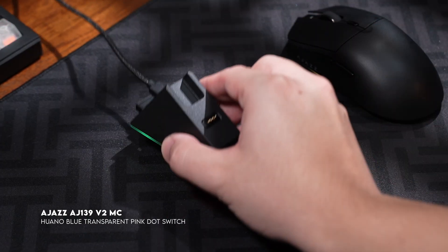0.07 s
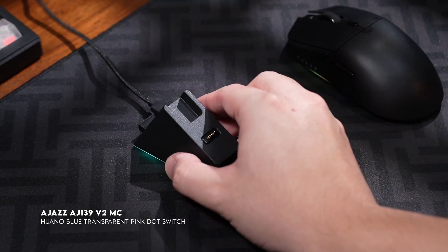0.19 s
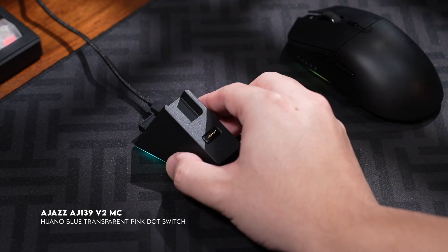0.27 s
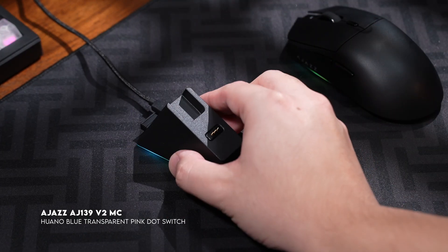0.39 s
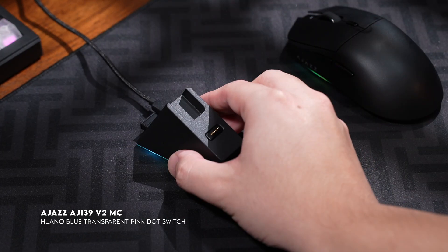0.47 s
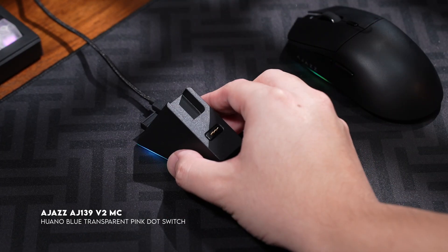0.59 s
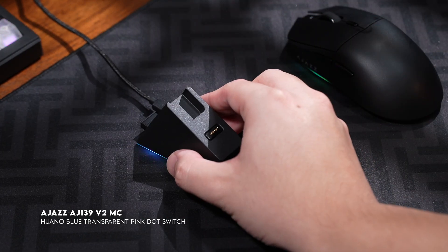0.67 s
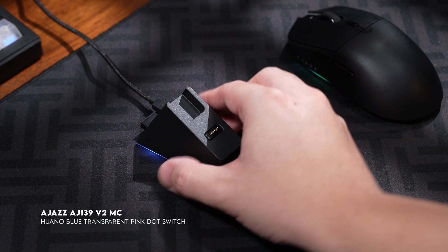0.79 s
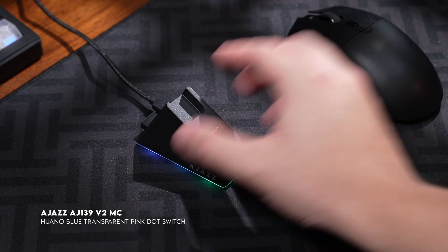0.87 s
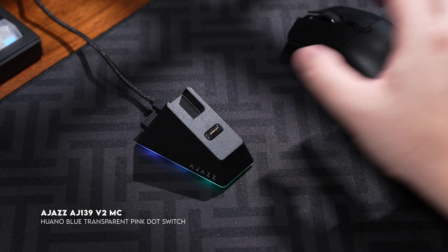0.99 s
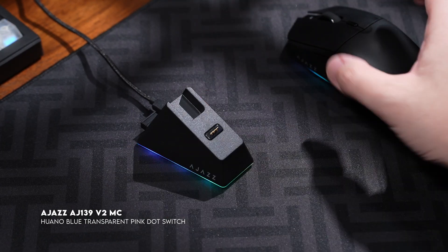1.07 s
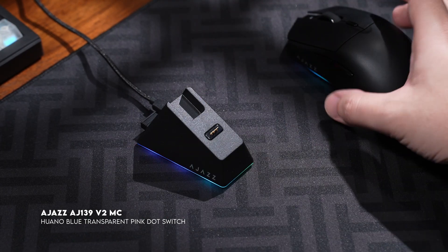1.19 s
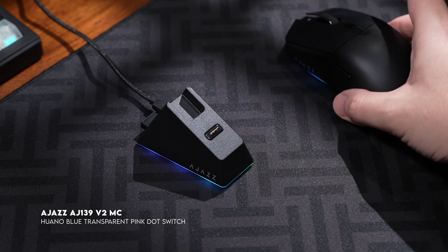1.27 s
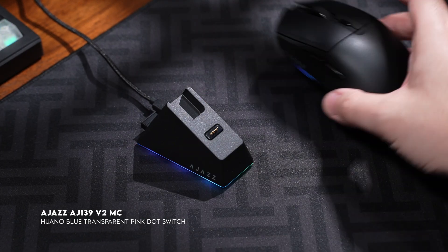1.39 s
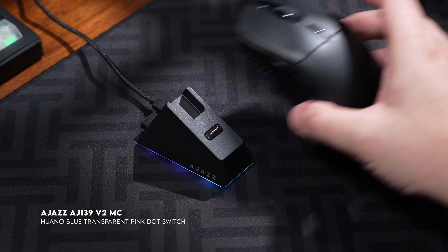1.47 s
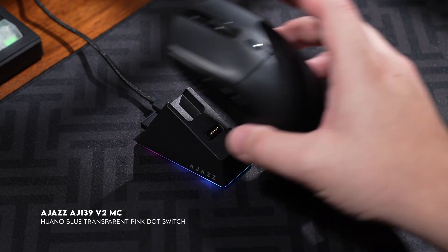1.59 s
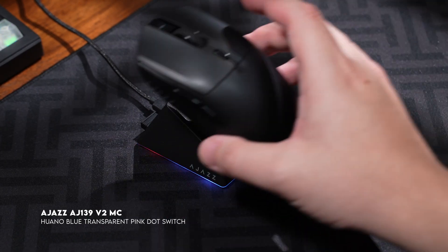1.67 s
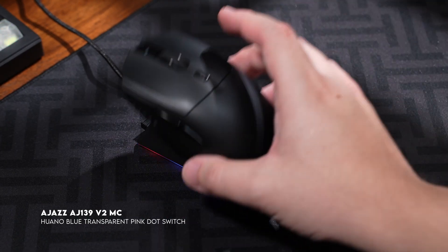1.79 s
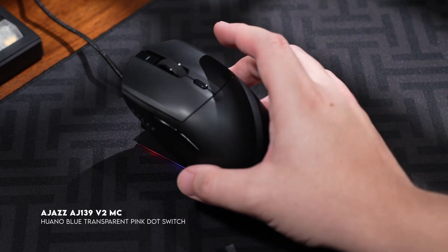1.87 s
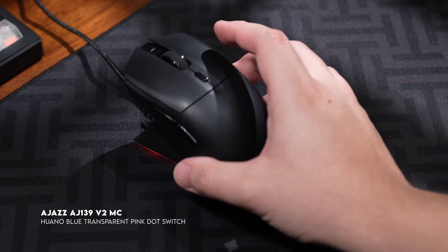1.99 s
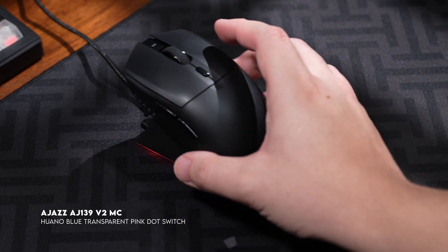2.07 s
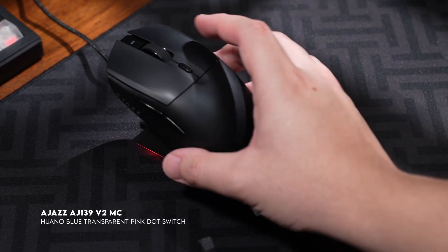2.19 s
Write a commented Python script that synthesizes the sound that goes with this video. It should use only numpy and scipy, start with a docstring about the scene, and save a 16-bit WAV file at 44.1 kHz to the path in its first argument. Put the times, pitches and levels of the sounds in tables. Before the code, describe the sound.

Two plastic knocks in a small, quietly humming room, close microphone. At 0.23 s a charging dock lands on a padded desk with a quick clattering thud and short boom. Faint finger brushes follow, clearest near 0.85 and 1.3 s. At 1.89 s a mouse clacks louder and brighter onto the dock, then scrapes and squeaks briefly at 2.0-2.2 s. A very faint high whine appears from about 1.5 s.

```python
"""Small room, low hum, one close microphone over a padded desk: hum bands and room tone run throughout.
First a plastic charging dock is set down: noise cracks, ringing housing modes, desk boom, room echo.
Then fingers brush it, swells of soft noise, and take hold of a computer mouse as a faint sine whine comes up.
The mouse clacks onto the dock, built like the first landing with a lip and a shell that ring,
and scrapes as it is seated: random tiny slips and noise drive a squeak."""
import sys
import numpy as np
from scipy import signal
from scipy.fft import rfft, irfft, next_fast_len
from scipy.io import wavfile

SR = 44100
rng = np.random.default_rng(int(sys.argv[2]) if len(sys.argv) > 2 else 0)


def materialize(psi):
    """Save the field psi as 16-bit PCM at rate SR to the path in sys.argv[1].

    A 1-D psi becomes a single channel; in a 2-D psi each row is a channel.
    """
    bounded = np.clip(np.atleast_2d(psi).T, -1, 1)
    quanta = np.round(bounded * 32767).astype(np.int16)
    wavfile.write(sys.argv[1], SR, quanta)


N = 97020  # samples, 2.2 s


def amp(db):
    """Decibels to gain."""
    return 10 ** (np.asarray(db) / 20)


def unit(x):
    """Scaled to rms 1."""
    return x / np.sqrt(np.mean(x ** 2) + 1e-20)


def along(points, hz):
    """(Hz, value) points read on a log frequency axis."""
    f, v = np.transpose(points)
    return np.interp(np.log(hz + 1), np.log(f + 1), v)


def filtered(x, response):
    """x times a response of frequency, with padding against wrap-around."""
    m = next_fast_len(len(x) + 8192)
    spectrum = rfft(x, m) * response(np.fft.rfftfreq(m, 1 / SR))
    return irfft(spectrum, m)[:len(x)]


def coloured(x, colour):
    """x filtered by a curve of (Hz, dB) points, at rms 1."""
    return unit(filtered(x, lambda hz: amp(along(colour, hz))))


def noise(colour):
    """Coloured noise of rms 1."""
    return coloured(rng.standard_normal(N), colour)


def since(s):
    """Seconds since a moment, zero before it."""
    return np.maximum(np.arange(N) / SR - s, 0)


def decay(t, t60):
    """Gain of a sound that falls 60 dB in t60 seconds."""
    return np.exp(-np.log(1000) * t / t60)


def soft(hz, dull_hz):
    """A soft contact passes less treble: 3 dB down at dull_hz, then 12 dB per octave."""
    return 1 / np.sqrt(1 + (hz / dull_hz) ** 4)


def swell(s, rise, fall):
    """A bell-shaped stroke peaking at s, its rise and fall given as standard deviations."""
    t = np.arange(N) / SR - s
    return np.exp(-.5 * (t / np.where(t < 0, rise, fall)) ** 2)


def ring(s, modes, dull_hz, attack):
    """Damped sine modes struck at s, cut off after twice the longest t60."""
    out, t = np.zeros(N), since(s)
    live = (t > 0) & (t < 2 * max(mode[2] for mode in modes))
    t = t[live]
    total = np.zeros(len(t))
    for hz, db, t60 in modes:
        total += amp(db) * soft(hz, dull_hz) * decay(t, t60) * np.sin(2 * np.pi * hz * t)
    out[live] = (1 - np.exp(-t / attack)) * total
    return out


def crack(s, colour, t60, dull_hz):
    """A short noise burst standing for dense plastic resonances."""
    rise_s = .0002
    t = since(s)
    burst = filtered(noise(colour), lambda hz: soft(hz, dull_hz))
    return burst * (1 - np.exp(-(t / rise_s) ** 2)) * decay(t, t60)


# How long the small room rings. Each row: frequency in Hz, t60 in seconds.
ROOM_DECAY = [(80, .4), (300, 0.29), (1000, .27), (3000, 0.26), (8000, 0.24), (15000, .2)]


def tail(s, colour):
    """Diffuse room sound swelling in just after s, each frequency dying at its own speed."""
    delay_s, rise_s = 0.001, 0.008  # it starts delay_s after s
    hz, t, z = signal.stft(noise(colour), SR, nperseg=256)
    fade = decay(np.maximum(t - s, 0), along(ROOM_DECAY, hz)[:, None])
    diffuse = signal.istft(z * fade, SR)[1][:N]
    return diffuse * (1 - np.exp(-since(s + delay_s) / rise_s))


# Room tone at the microphone. Each row: frequency in Hz, relative level in dB per Hz.
ROOM_TONE = [(12, -49), (20, -24), (43, -2.5), (63, -7.5), (79, -6), (104, -0.5), (142, -7), (172, -3.5),
             (222, -10), (262, -8.5), (590, -25), (642, -23), (698, -24), (897, -21.5), (1330, -29),
             (6720, -44.5), (10200, -52), (11400, -50), (16000, -57.5)]
# Narrow bands of the room's hum. Each row: centre in Hz, width in Hz, rms level in dB.
HUM_BANDS = [(112.4, 16, -61), (169.5, 12, -64.5), (267, 23, -66), (352, 10, -69), (629.5, 8, -79)]
# The dock's electronics, loud and soft. Each row: time in seconds, sine amplitude in dB.
WHINE_LEVELS = [(1.35, -108), (1.55, -88), (1.66, -76.5), (1.85, -83.5), (1.95, -100), (2.07, -78),
                (2.19, -87)]
ROOM_TONE_DB, WHINE_HZ = -56, 11111


def background():
    """Noise makes the room tone and the fuzzy hum bands; one sine is the thin electronic whine."""
    hum = np.zeros(N)
    for centre_hz, width_hz, db in HUM_BANDS:
        band = filtered(rng.standard_normal(N), lambda f: soft(f - centre_hz, width_hz / 2))
        hum += amp(db) * unit(band)
    whine_level = amp(np.interp(since(0), *np.transpose(WHINE_LEVELS)))
    whine = whine_level * np.sin(2 * np.pi * WHINE_HZ * since(0))
    return amp(ROOM_TONE_DB) * noise(ROOM_TONE) + hum + whine


# Fingers brushing plastic close by.
# Each row: peak in seconds, rise in seconds, fall in seconds, level in dB, dull above Hz.
FINGER_BRUSHES = [(.385, 0.069, 0.034, -69.5, 8700), (.66, 0.0098, 0.02, -78.5, 9000),
                  (0.852, 0.014, 0.018, -60, 12000), (1.306, 0.0044, 0.0056, -58, 4500),
                  (1.315, .025, .03, -69, 6080), (1.371, 0.0089, 0.013, -71, 10100)]
# Tone of skin on plastic. Each row: frequency in Hz, relative level in dB per Hz.
SKIN_COLOUR = [(200, 4), (1200, -3.5), (2400, -3), (3300, 1.5), (4200, -3.5), (6000, 1), (9000, -4),
               (12500, -2.5), (15500, -14)]


def fingers():
    """Skin slides off the dock and takes hold of the mouse: swells of dulled noise."""
    out = np.zeros(N)
    for s, rise, fall, db, dull_hz in FINGER_BRUSHES:
        skin = unit(filtered(noise(SKIN_COLOUR), lambda hz: soft(hz, dull_hz)))
        out += amp(db) * swell(s, rise, fall) * skin
    return out


# Mouse scraping in its cradle.
# Each row: peak in seconds, rise in seconds, fall in seconds, pressure level in dB.
SCRAPE_STROKES = [(1.994, 0.0033, 0.0073, -52.5), (2.031, 0.0032, 0.0042, -45),
                  (2.047, 0.0036, 0.0011, -44.5), (2.052, 0.0022, 0.0039, -43),
                  (2.064, 0.0024, .002, -47.5), (2.152, 0.0022, 0.0048, -51.5),
                  (2.177, 0.017, 0.0085, -46.5), (2.192, 0.0084, 0.018, -39.5)]
# Tone of plastic on plastic. Each row: frequency in Hz, relative level in dB per Hz.
FRICTION_COLOUR = [(100, 5), (500, -11.5), (850, -6.5), (1350, -15), (1750, -6.5), (2150, 3), (2750, -9),
                   (3300, -9.5), (4800, -9.5), (5650, -6.5), (6800, -11.5), (8000, -15), (9700, -22),
                   (11000, -26), (15500, -34)]
# Resonances the slips ring in shell and cradle. Each row: Hz, relative level in dB, t60 in seconds.
SQUEAK_MODES = [(1840, -6, 0.017), (2156, 1, 0.031), (3330, -15, .015), (5700, -8, 0.018),
                (6330, -11, 0.014)]
SLIPS_PER_S, SLIP_SHARE = 1500, 0.57  # mean rate; share of the driving power, the rest being steady noise
SQUEAK_DB, SCRAPE_ROOM_DB = -4.5, -12.5
LIGHT_DULL_HZ, BITE_DB = 3070, -39.5  # a light touch is dull; the treble opens around this pressure


def scrapes():
    """Tiny slips of plastic on plastic ring the shell, brighter under more pressure."""
    slips = unit((rng.random(N) < SLIPS_PER_S / SR) * rng.standard_normal(N))
    force = np.sqrt(SLIP_SHARE) * slips + np.sqrt(1 - SLIP_SHARE) * rng.standard_normal(N)
    resonance = ring(0, SQUEAK_MODES, dull_hz=12000, attack=0.0005)
    squeak = unit(signal.fftconvolve(force, resonance)[:N])
    friction = coloured(force, FRICTION_COLOUR) + amp(SQUEAK_DB) * squeak
    dull_friction = filtered(friction, lambda hz: soft(hz, LIGHT_DULL_HZ))
    pressure = sum(amp(db) * swell(s, rise, fall) for s, rise, fall, db in SCRAPE_STROKES)
    bite = np.tanh(pressure / amp(BITE_DB))
    direct = pressure * (bite * friction + (1 - bite) * dull_friction)
    room = tail(0, [(100, 1), (15000, -23)])
    echo = signal.fftconvolve(direct, room / np.linalg.norm(room))[:N]
    return direct + amp(SCRAPE_ROOM_DB) * echo


# Weight landing on the desk. Each row: start in seconds, level in dB, dull above Hz, thin below Hz.
DESK_THUMPS = [(0.2306, -36, 400, 60), (0.2368, -10, 620, 32), (1.8891, -13.5, 231.5, 56),
               (1.992, -34.5, 126, 50)]
# Modes of the desk top. Each row: frequency in Hz, relative level in dB, t60 in seconds.
DESK_MODES = [(37.3, -23.5, 0.6), (69.3, -21.5, 0.49), (84.1, -15.5, 0.19), (107.7, 1, 0.18),
              (142, -2, 0.17), (163.6, -2.5, 0.19), (180.4, -16, .24), (257.3, -8.5, .26),
              (294.8, -5.5, 0.13), (311, 3, 0.052), (368.2, -12, 0.25), (401.3, -12.5, 0.12),
              (465, -20, 0.25), (548.7, -11, 0.1), (626, -10.5, .13)]


def desk():
    """The padded desk top booms under each load; a high-pass thins the deep bass of each thump."""
    out = np.zeros(N)
    for s, db, dull_hz, thin_hz in DESK_THUMPS:
        boom = ring(s, DESK_MODES, dull_hz, attack=0.0016)
        high_pass = signal.butter(2, thin_hz, "highpass", fs=SR, output="sos")
        out += amp(db) * signal.sosfilt(high_pass, boom)
    return out


# The dock's base meeting the desk. Each row: start in seconds, level in dB.
BASE_CONTACTS = [(0.2305, -39), (0.2355, -19.5), (0.2376, -20.5), (.2398, -21.5)]
# Noisy crack of the base. Each row: frequency in Hz, relative level in dB per Hz.
BASE_CRACK = [(100, -3.5), (500, 7.5), (1100, -3), (1700, -10), (2400, 0.5), (2900, -13.5), (4200, -11),
              (6000, -16.5), (7500, -19), (10000, -28), (13500, -30.5), (15800, -43)]
# Modes of the dock's housing. Each row: frequency in Hz, relative level in dB, t60 in seconds.
HOUSING_MODES = [(788, -5.5, 0.049), (890, -23, .03), (1322, -2, 0.037), (2000, -21.5, 0.035),
                 (2322, 1, 0.037), (2760, -29, 0.026), (3730, -6, 0.028), (3990, -14, 0.055),
                 (4120, -15, 0.024), (7310, -9.5, 0.018), (7400, -13, 0.013), (8760, -20.5, 0.028)]
# The room's answer to the dock. Each row: frequency in Hz, relative level in dB per Hz.
DOCK_ROOM = [(50, -27), (90, 4), (170, -2), (330, 9), (680, -1.5), (1000, -11), (1700, -20.5),
             (2100, -19.5), (2330, -11), (2700, -19), (4200, -23.5), (7500, -32), (10000, -47),
             (15000, -42)]
DOCK_CRACK_T60, DOCK_RING_DB, DOCK_ECHO_DB = .028, -19, -25.5  # s, dB, dB


def dock():
    """The base touches down edge by edge: four cracks, the third also ringing the housing."""
    cracks = sum(amp(db) * crack(s, BASE_CRACK, DOCK_CRACK_T60, dull_hz=14950) for s, db in BASE_CONTACTS)
    second, third = BASE_CONTACTS[1][0], BASE_CONTACTS[2][0]
    housing = amp(DOCK_RING_DB) * ring(third, HOUSING_MODES, dull_hz=13900, attack=0.00051)
    echo = amp(DOCK_ECHO_DB) * tail(second, DOCK_ROOM)
    return cracks + housing + echo


# The mouse meeting the dock. Each row: start in seconds, level in dB, dull above Hz.
SHELL_CONTACTS = [(1.885, -20.5, 14000), (1.8875, -8.5, 7940), (1.8893, -16, 4910), (1.8908, -21.5, 5020)]
# Noisy crack of the mouse. Each row: frequency in Hz, relative level in dB per Hz.
SHELL_CRACK = [(100, -22.5), (620, -19.5), (850, -6), (1400, -3.5), (1850, -11), (2200, 5.5), (3400, -4),
               (5500, -7.5), (8300, -3.5), (9700, -12.5), (11500, -6.5), (14000, -15), (15800, -23)]
# Modes of the cradle's lip, touched first. Each row: Hz, relative level in dB, t60 in seconds.
LIP_MODES = [(2195, -5.5, 0.036), (7360, -9.5, 0.029), (7770, -2.5, 0.015), (7940, 1.5, 0.018),
             (8680, -2, 0.015)]
# Modes of the mouse shell on the dock. Each row: Hz, relative level in dB, t60 in seconds.
SHELL_MODES = [(848, -2, 0.033), (890, -0.5, 0.028), (1112, -3, .035), (1297, -6.5, 0.035),
               (1590, -8, .028), (2158, -2, .035), (2350, -4.5, 0.043), (2400, -6, 0.058), (2780, -26, .03),
               (3225, -7, 0.031), (4020, -15, .025), (4580, -9, 0.016), (4750, -4.5, .022),
               (5680, -11, .025)]
# The room's answer to the mouse. Each row: frequency in Hz, relative level in dB per Hz.
MOUSE_ROOM = [(50, -20), (100, 17), (200, 13), (350, 7), (600, -2), (880, 5), (1300, -1), (1750, -8.5),
              (2200, 4), (3000, -5), (5500, -6), (8600, -5), (9500, -18.5), (11800, -17), (13000, -27),
              (15500, -30.5)]
MOUSE_CRACK_T60, LIP_RING_DB, SHELL_RING_DB, MOUSE_ECHO_DB = 0.017, -15, -12.5, -27.5  # s, then dB


def mouse():
    """A bright first touch on the lip, then the shell drops home, rings and chatters."""
    cracks = sum(amp(db) * crack(s, SHELL_CRACK, MOUSE_CRACK_T60, dull_hz)
                 for s, db, dull_hz in SHELL_CONTACTS)
    touch, home = SHELL_CONTACTS[0][0], SHELL_CONTACTS[1][0]
    lip = amp(LIP_RING_DB) * ring(touch, LIP_MODES, dull_hz=15000, attack=0.00044)
    shell = amp(SHELL_RING_DB) * ring(home, SHELL_MODES, dull_hz=12000, attack=0.0016)
    echo = amp(MOUSE_ECHO_DB) * tail(touch, MOUSE_ROOM)
    return cracks + lip + shell + echo


def scene():
    """Everything at one close microphone."""
    return (dock() + mouse() + desk() + scrapes() + fingers() + background())[None]


def record(dry):
    """The microphone loses its top treble; the recorder keeps nothing above its band limit."""
    mic_dull_hz, top_hz = 15800, 15900
    response = lambda hz: (hz < top_hz) / (1 + (hz / mic_dull_hz) ** 10)
    return np.array([filtered(x, response) for x in dry])


dry = scene()
out = record(dry)
materialize(out)
```